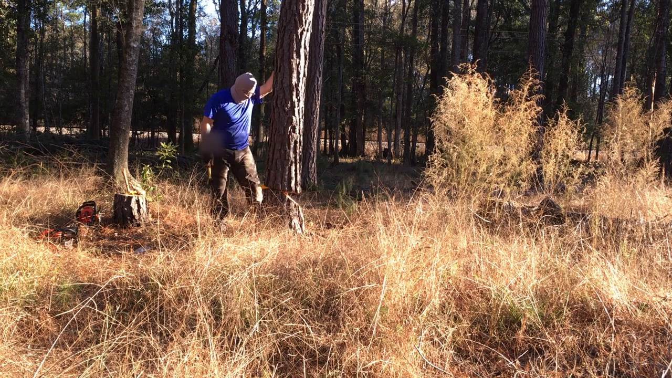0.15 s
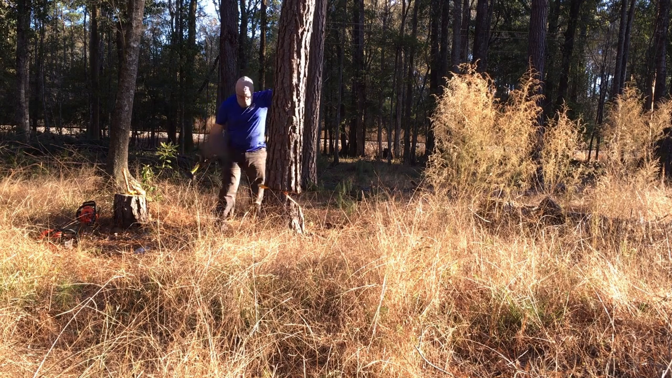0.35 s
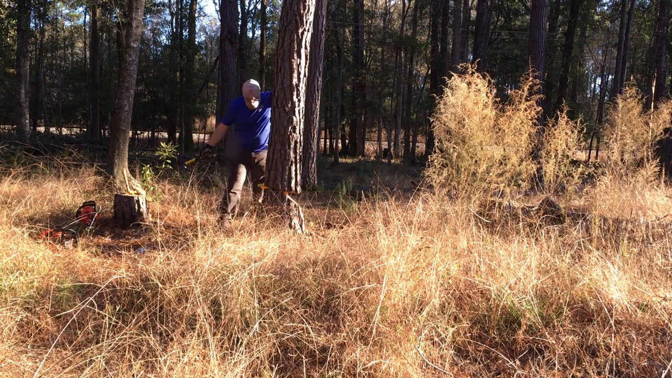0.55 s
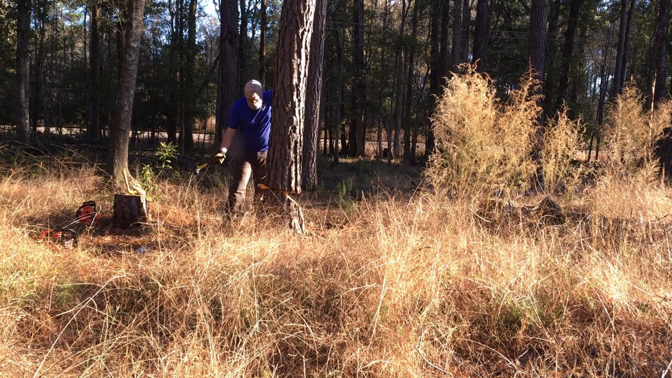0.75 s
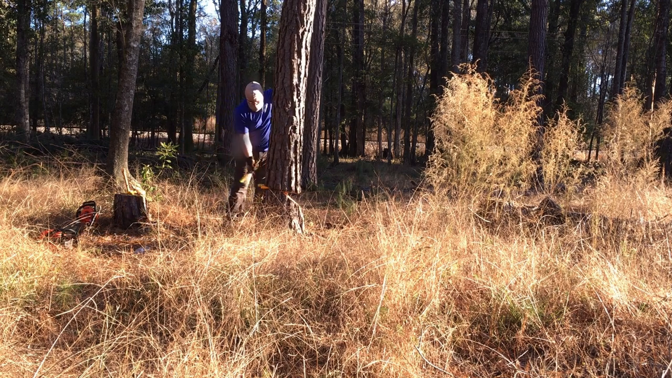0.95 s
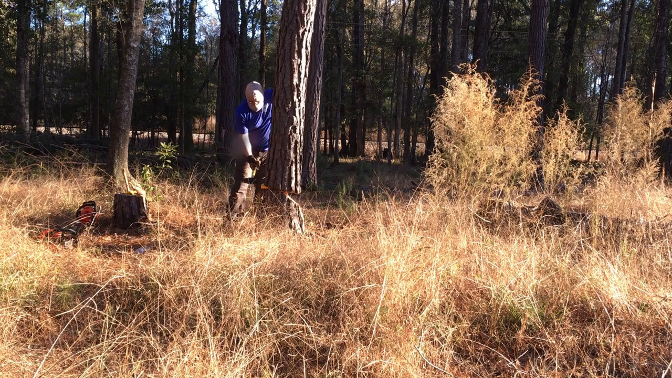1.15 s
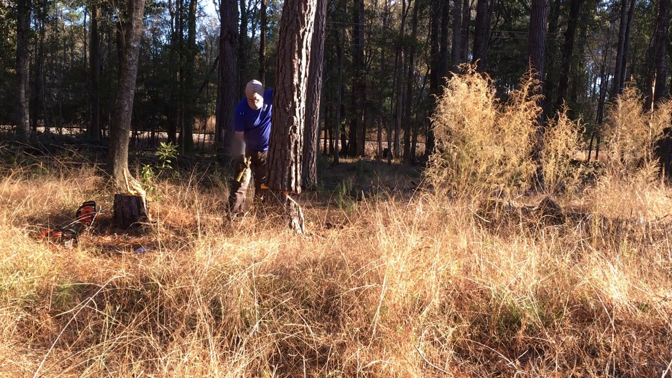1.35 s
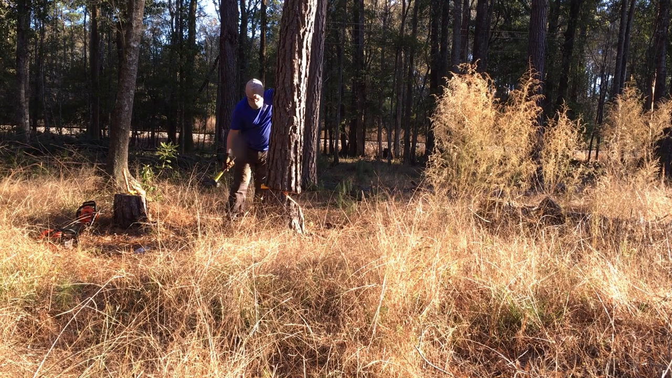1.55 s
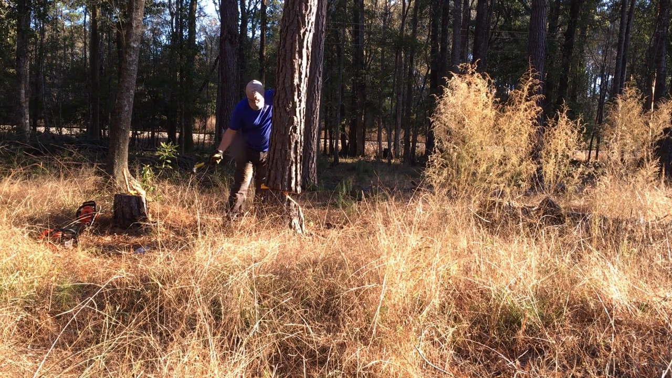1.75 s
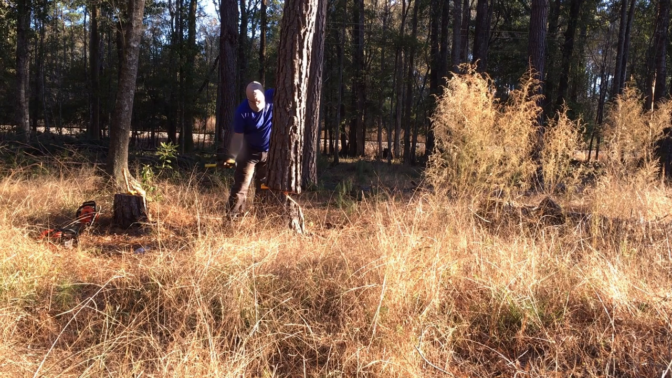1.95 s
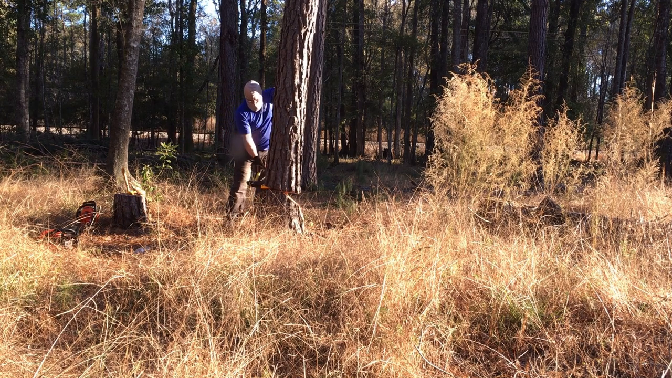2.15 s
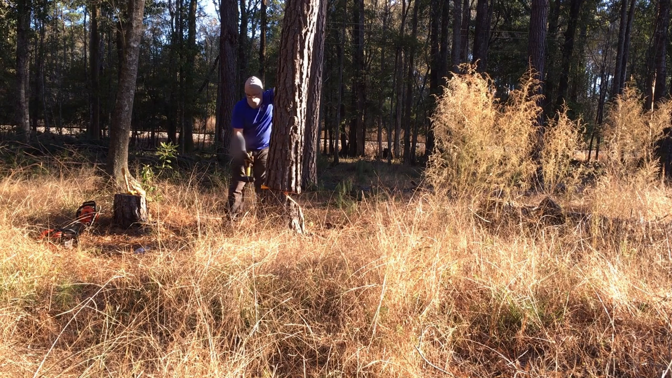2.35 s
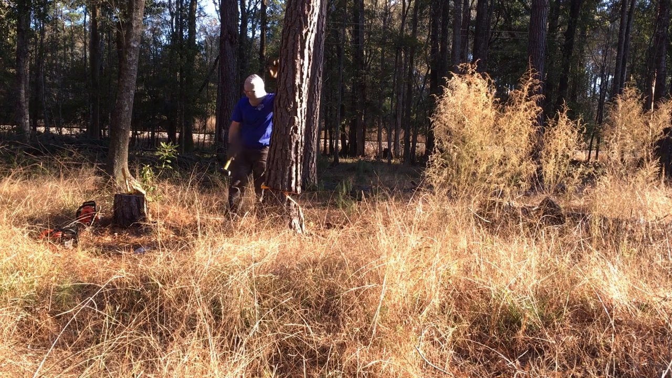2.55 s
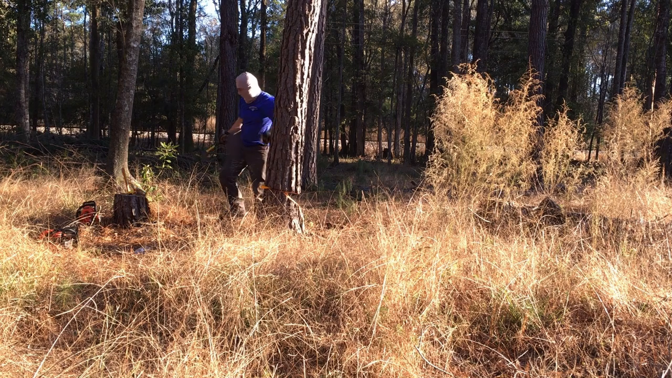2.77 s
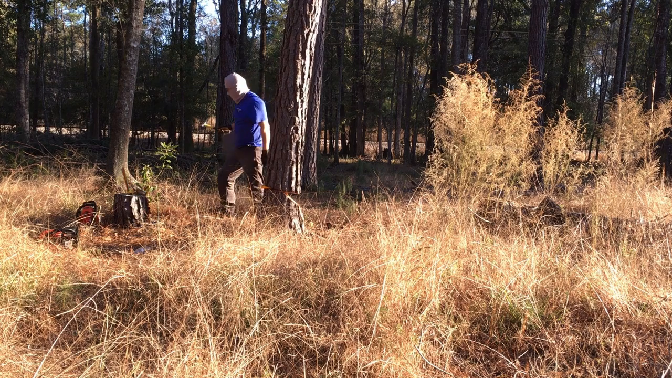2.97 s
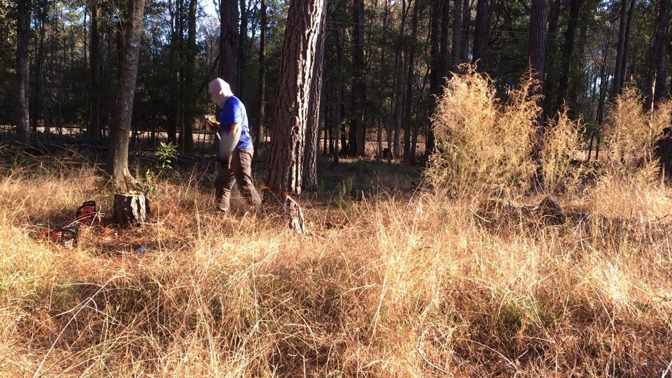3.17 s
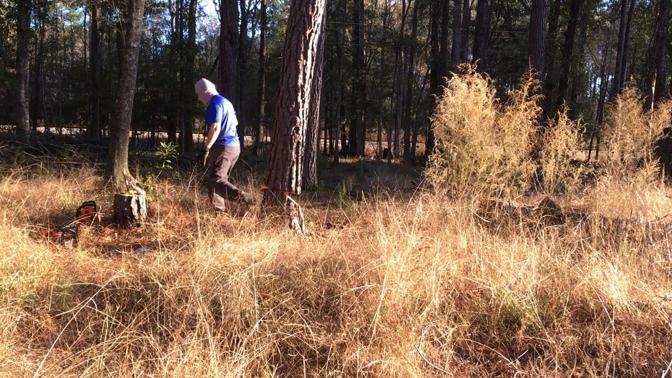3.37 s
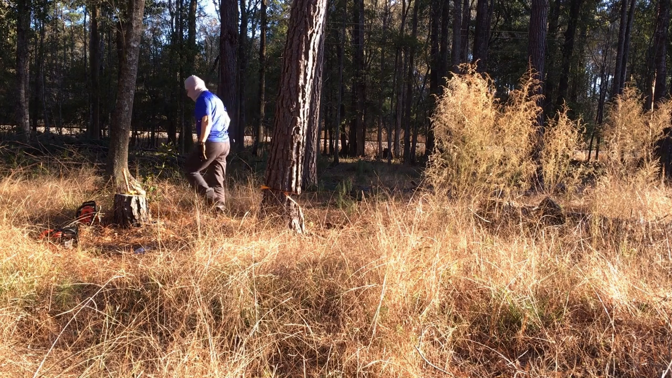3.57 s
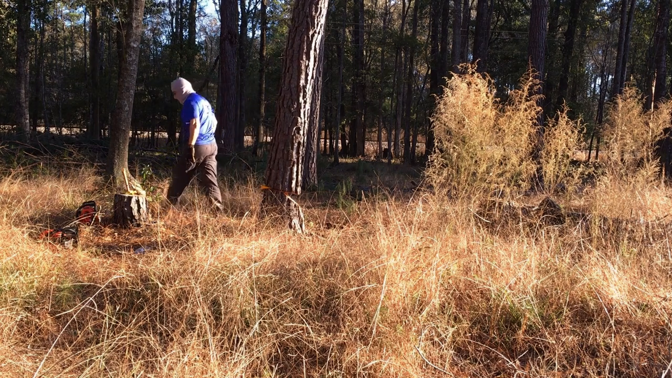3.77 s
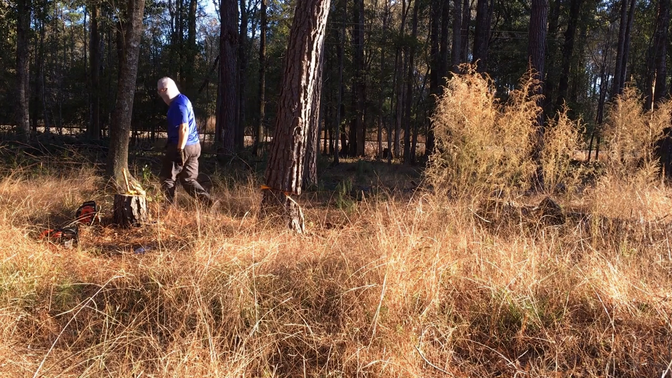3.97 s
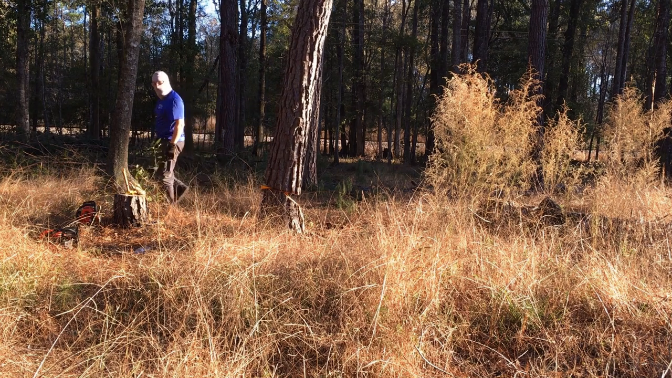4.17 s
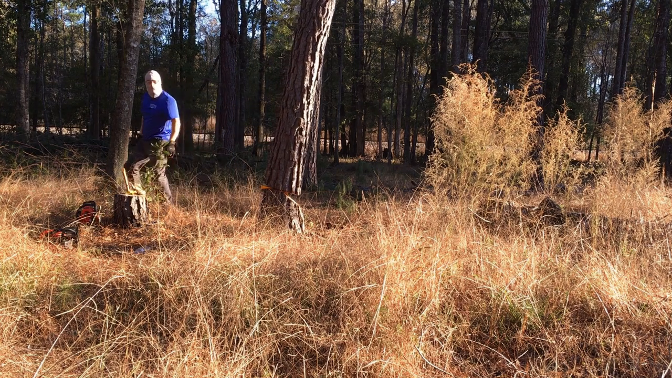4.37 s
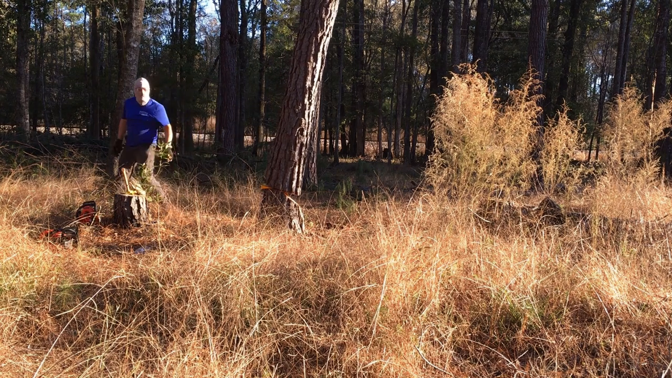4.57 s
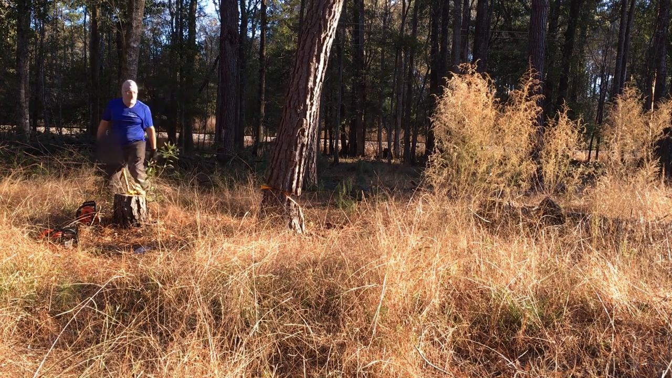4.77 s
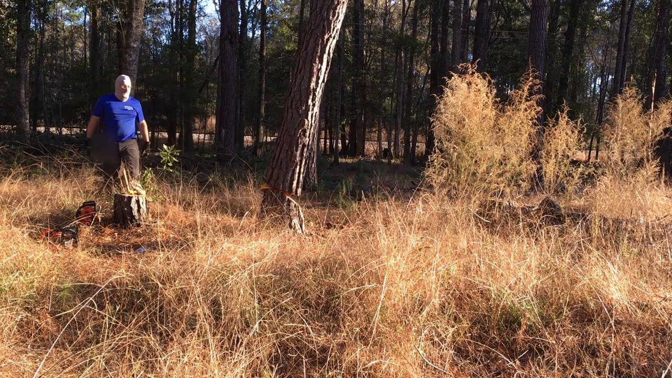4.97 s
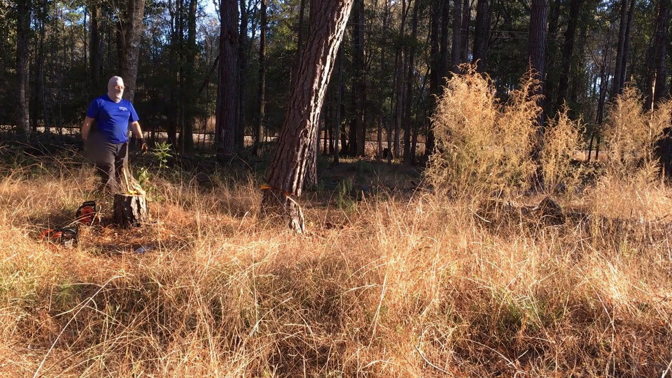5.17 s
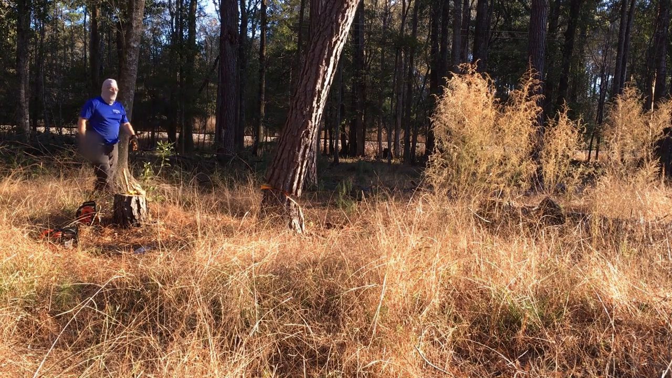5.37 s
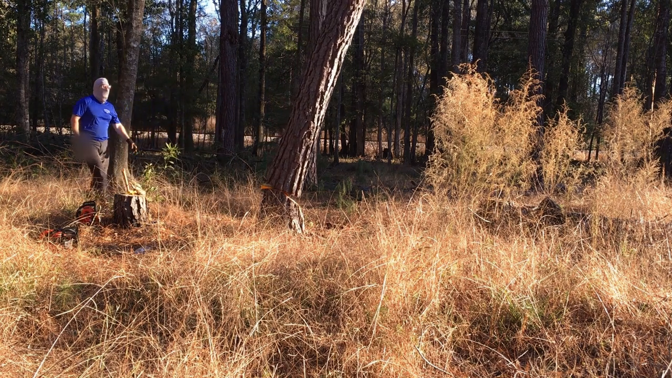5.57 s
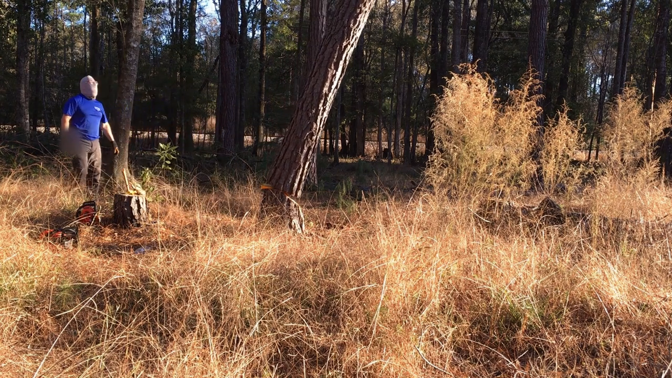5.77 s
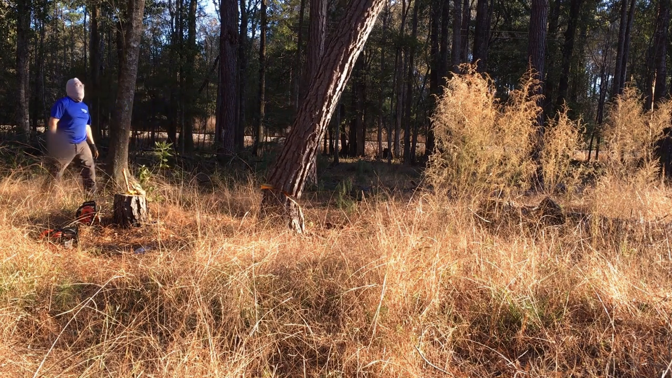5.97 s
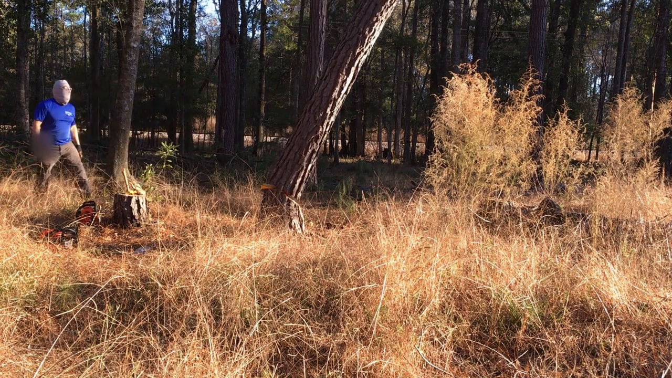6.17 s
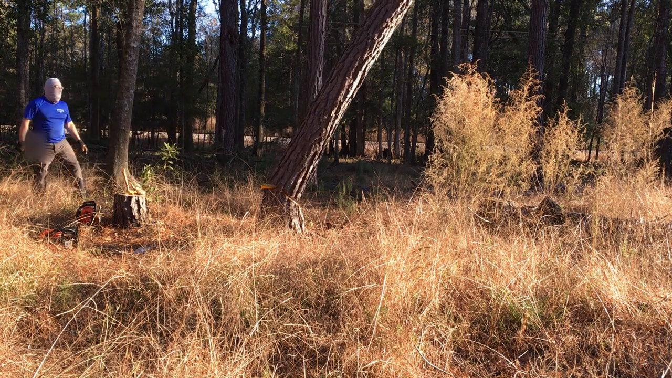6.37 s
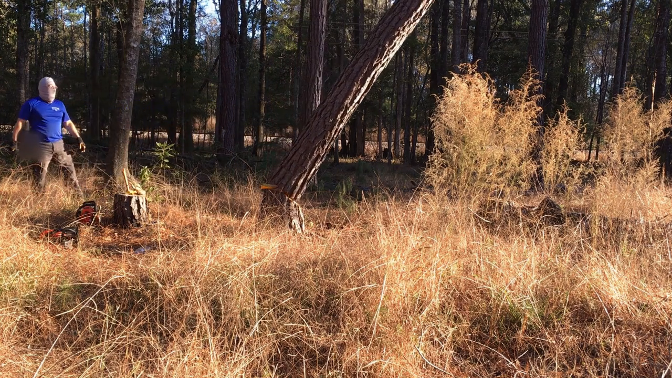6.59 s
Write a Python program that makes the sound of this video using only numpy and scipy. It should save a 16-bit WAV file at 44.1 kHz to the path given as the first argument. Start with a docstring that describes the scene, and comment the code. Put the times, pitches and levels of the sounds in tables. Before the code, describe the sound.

A quiet woodland edge, with a faint low rumble of still air and slight dry-grass rustling, soft footfalls at about 0.4 and 0.7 seconds. At 1.05 a loud, sharp double-edged crack bursts from a tree trunk, with a woody knock, brief splintering and echoes from the surrounding trees. A second strong, hollow crack comes at 2.2. From about 2.7 to 4.9 legs brush through dry stalks with dull steps, most clearly around 3.3 and 3.8 to 4.0, while isolated fibres tick, growing more frequent from 4.4. A thinner, snappier crack falls at 5.1. Ticks and pops then crowd together, and from about 5.5 a dry, dense crackle rises. At 6.4 the loudest crack bursts out, bright and ragged, with several splintering aftershocks. Tearing continues, still intensifying, until the end at 6.6 seconds, before any fall is heard.

```python
"""At the edge of a wood a notched pine starts to go over. Its hinge, the wood left uncut, gives four loud cracks.
Each crack mixes a snap, a knock and splintering that rings the trunk; echoes return from the trees.
In between, single fibres tick as short bursts, while thin ones tear ever faster into a dense crackle.
The feller moves through dry grass, made of random clicks; filtered noise is a faint low rumble.
"""
import sys
import numpy as np
from scipy import signal
from scipy.fft import rfft, irfft
from scipy.io import wavfile

SR = 44100
rng = np.random.default_rng(int(sys.argv[2]) if len(sys.argv) > 2 else 0)


def wav_out(sig):
    """Save sig, one row per channel (or a flat mono array), as 16-bit PCM at SR to the path in sys.argv[1]."""
    wavfile.write(sys.argv[1], SR, np.round(np.clip(np.atleast_2d(sig).T, -1, 1) * 32767).astype(np.int16))


N = 292383
TIME = np.arange(N) / SR
BRIEF = TIME[:SR // 8]  # time axis of one short burst

# loud breaks of the hinge: [t/s, snap level/dB, wood level/dB, wood pitch f/Hz,
# splintering decay t/s, knock f/Hz, knock level/dB]
HINGE_BREAKS = [(1.0509, -21.5, -22.5, 1860, 0.0013, 790, -27.5),
                (1.055, -27, -19.5, 2800, 0.001, 1930, -22), (1.058, -38.5, -9.5, 2150, 0.0078, 813, -19),
                (2.1655, -27, -9, 1620, 0.0072, 805, -14.5),
                (5.1037, -21, -24.5, 1350, 0.0046, 1185, -23.5), (5.111, -37, -36, 1200, .006, 760, -37.5),
                (6.3923, -12.5, -8.5, 2150, 0.00053, 1190, -17),
                (6.3932, -46, -12.5, 4020, 0.011, 372, -32), (6.4007, -25, -12.5, 3370, 0.0055, 1210, -34),
                (6.419, -39, -15.5, 3100, .001, 1180, -41), (6.4235, -41, -16.5, 2720, 0.014, 1170, -52)]
# ways the cut trunk rings: [f/Hz, width f/Hz, relative level/dB]
TRUNK_MODES = [(737, 200, -4.5), (1110, 280, -9), (1440, 410, -2), (1783, 90, -1), (2200, 43, -8),
               (3150, 350, -5), (3700, 500, -3)]
# tone colour of the snap: [f/Hz, relative level/dB]
SNAP_COLOUR = [(100, 7), (500, -17), (900, -6.5), (1800, 8.5), (3300, -11.5), (4300, -4), (6000, -2.5),
               (9000, -1.5), (11000, -14.5), (16000, -26.5)]
# tone colour of the splintering: [f/Hz, relative level/dB]
SPLINTER_COLOUR = [(100, -2), (300, -53.5), (480, -10.5), (750, -6), (2000, 0), (4200, -2), (5200, -2),
                   (9000, -6), (16000, -10.5)]
# the trunk shudders after the big breaks: [t/s, level/dB, lowest f/Hz]
TRUNK_SHUDDERS = [(1.056, -41, 49.3), (2.165, -37.5, 45), (5.102, -47.5, 130), (6.391, -37, 150)]
# tone colour of the shudder and of a footfall's thud: [f/Hz, relative level/dB]
SHUDDER_COLOUR = [(25, -29.5), (60, 6), (100, -10.5), (140, -8.5), (220, -5), (340, -6.5), (500, -15.5),
                  (1200, -51)]
# thick fibres parting one by one: [t/s, relative level/dB, brightness f/Hz, relative stump ring level/dB]
THICK_FIBRES = [(2.074, -40.5, 8000, -31), (3.319, -33, 2380, -19), (3.447, -36.5, 5900, -30.5),
                (3.532, -25.5, 2820, -16.5), (3.926, -31, 2250, -22), (4.366, -40, 6000, -24),
                (4.4319, -23, 2370, -28), (4.497, -20, 2800, -15), (4.681, -42, 3400, -6.5),
                (4.768, -50.5, 2800, -1), (4.855, -28, 4150, -31), (5.135, -35, 4500, -21),
                (5.1683, -29.5, 9060, -35), (5.3344, -33.5, 5400, -24), (5.399, -26.5, 3300, -26),
                (5.4543, -15, 2870, -25), (5.589, -16, 3330, -28), (5.659, -29.5, 6900, -53),
                (5.6732, -18, 6270, -28.5), (5.678, -23, 3350, -29), (5.733, -20.5, 4740, -24),
                (5.7712, -14, 3120, -28.5), (5.824, -25, 4400, -25), (5.8674, -28.5, 3400, -19),
                (5.89, -22.5, 2940, -20), (5.983, -19.5, 8500, -29), (6.037, -22.5, 4400, -29),
                (6.103, -17, 4080, -32.5), (6.186, -23.5, 4200, -14.5), (6.2287, -27, 4500, -18),
                (6.368, -18.5, 3770, -21.5), (6.303, -29, 3500, -20), (6.535, -17.5, 2680, -19.5),
                (6.608, -19, 3740, -11), (6.6264, -17.5, 2160, -7.5)]
# tone colour of parting fibres and of the rasp: [f/Hz, relative level/dB]
TICK_COLOUR = [(100, -21), (500, -20.5), (900, -12.5), (1800, 0.5), (2400, -3.5), (3300, 0.5), (4300, 0),
               (6000, -0.5), (9000, -1), (11000, -6), (16000, -13)]
# echoes off the nearest trunks, before they are dulled: [delay t/s, level/dB]
NEAR_ECHOES = [(.008, -18.5), (.027, -22.5), (0.0304, -18), (.037, -22.5), (.05, -39), (.066, -30.5)]
# answer of the far wood: [f/Hz, relative level/dB, time to fall by 60 dB t/s]
FAR_WOOD = [(152, -30, 0.61), (400, -22, 0.54), (760, -11.5, 2.8), (1150, -12.5, 1.5), (1600, -21.5, 2.1),
            (2250, -20, 1.5), (3400, -17.5, 1.3), (4760, -19.5, .7), (6600, -19.5, .65), (9500, -21, 0.43),
            (15000, -37.5, 0.33)]
# legs sweep through dry grass: [t/s at the peak, level/dB, swell t/s]
LEG_SWEEPS = [(.42, -70, 0.02), (0.702, -57, 0.042), (2.08, -76.5, .08), (2.75, -59.5, 0.077),
              (3.2, -65, 0.1), (3.7, -63.5, 0.031), (3.832, -53, 0.04), (4.008, -54.5, 0.024),
              (4.501, -69, 0.085), (4.842, -63, 0.13)]
# faint rustle between the sweeps, standing and then walking: [t/s, level/dB]
RUSTLE_LEVEL = [(0, -96), (.35, -77.5), (1.8, -82.5), (2.9, -69.5), (6.63, -75.5)]
# tone colour of dry stalks: [f/Hz, relative level/dB]
STALK_COLOUR = [(200, -7), (500, -12), (1100, -6), (2200, -5), (3500, -1), (6000, -0.5), (9500, -1.5),
                (10800, -5.5), (14000, -5.5), (16000, -17.5)]
# footfalls: [t/s, thud level/dB, scuff level/dB]
FOOTFALLS = [(0.355, -61, -75), (0.678, -49, -67), (3.317, -42.5, -74), (4.15, -55, -66),
             (4.678, -49.5, -71)]
# tone colour of the still air of the wood: [f/Hz, relative level/dB]
AIR_COLOUR = [(20, -37.5), (35, -6.5), (62, 2.5), (95, 3), (140, -5.5), (250, -14.5), (500, -21.5),
              (1300, -24), (2500, -28.5), (5000, -36), (10000, -46), (16000, -44.5)]
# loudness of that air: [t/s, level/dB]
AIR_LEVEL = [(0, -71.5), (.3, -67), (.4, -61.5), (3, -62.5), (6.63, -57.5)]

SNAP_HZ, SNAP_WIDTH_HZ = 4500, 13230
FAR_RING_DB = -13  # trunk ring and knock in what spreads into the wood
STUMP_HZ, STUMP_WIDTH_HZ = 1139, 125
FIBRE_RASP_S, FIBRE_RASP_DB = 0.004, -8  # short rasp of a thick fibre, relative to its tick
# the tearing grows exponentially throughout; around GIVE_S the hinge gives and the rasp sets in
GIVE_S, GIVE_SPAN_S, RUNAWAY_S = 5.614, 0.34, 0.55
# thin fibres: constant base rate, and the growing rate and the level as they stand at GIVE_S
CREEP_PER_S, TEAR_PER_S, THIN_FIBRE_DB = 6, 45, -47
STRAIN_DB_PER_S, FIBRE_SIZE_SPREAD_DB = 5.5, 4.0
# a thick fibre takes thin ones with it, shortly before and after it parts
THIN_PER_THICK, CLUSTER_S = 2, 0.012
RASP_DB, RASP_PER_S, RASP_SPREAD_DB = -54, 2200, 5.0
SCUFF_HZ, SCUFF_WIDTH_HZ, SCUFF_S = 900, 890, 0.035
CUTOFF_HZ = 16300


def from_db(db):
    """Turn decibels into a plain loudness factor."""
    return 10 ** (np.asarray(db) / 20)


def rms_one(x):
    """Scale a sound to an average (rms) strength of 1."""
    return x / np.sqrt(np.mean(x ** 2) + 1e-20)


def unit_energy(x):
    """Scale a sound to a total energy of 1."""
    return x / np.sqrt(np.sum(x ** 2) + 1e-20)


def one_ms(x):
    """Scale a burst to the energy of one millisecond at rms 1."""
    return unit_energy(x) * np.sqrt(SR / 1000)


def level_curve(rows):
    """Join the levels of a (time, level) table by straight lines."""
    times, levels = np.transpose(rows)
    return np.interp(TIME, times, levels)


def at_hz(rows, hz, axis=1):
    """Read a column of a spectrum, evenly in pitch rather than in Hz."""
    rows = np.array(rows)
    return np.interp(np.log(hz + 1), np.log(rows[:, 0]), rows[:, axis])


def colour(x, spectrum, size=4096):
    """Filter to a given spectrum with no sound ahead of its cause (minimum phase)."""
    gain = from_db(at_hz(spectrum, np.fft.rfftfreq(size, 1 / SR)))
    cepstrum = irfft(np.log(gain))
    # folding the second half onto the first makes the filter respond at once
    cepstrum[1:size // 2] *= 2
    cepstrum[size // 2 + 1:] = 0
    response = irfft(np.exp(rfft(cepstrum)))
    return signal.fftconvolve(x, response)[:len(x)]


def resonance(x, hz, width_hz):
    """Let a sound ring around one pitch, with gain 1 at the top."""
    b, a = signal.iirpeak(hz, hz / width_hz, fs=SR)
    return signal.lfilter(b, a, x + 1e-18)


def low_cut(x, hz):
    """Steeply take away everything below a pitch."""
    return signal.sosfilt(signal.butter(4, hz, "high", fs=SR, output="sos"), x + 1e-18)


def burst(decay_s):
    """Make a dying volley of tiny fractures that push or pull."""
    return rng.choice([-1, 1], len(BRIEF)) * np.exp(-BRIEF / decay_s)


def grains(per_s, spread_db):
    """Scatter random clicks of uneven size, with rms near 1 at any rate."""
    excess = np.minimum(rng.exponential(1, N), 4)
    sizes = rms_one(from_db(spread_db * excess)) * rng.choice([-1, 1], N)
    happens = rng.random(N) < per_s / SR
    return sizes * happens * np.sqrt(SR / per_s)


def swell(s, span_s):
    """Rise and fall roundly to height 1 at time s, with exponential flanks."""
    return 1 - np.tanh((TIME - s) / span_s) ** 2


def add(out, s, sound):
    """Mix a sound in at time s."""
    start = int(np.clip(round(s * SR), 0, N - 1))
    out[start:start + len(sound)] += sound[:N - start]


def cracks(snap_decay_s=0.00089, ring_db=4.0, splinter_db=0.0, relative_width=0.88,
           rise_s=0.00018, knock_width_hz=100):
    """Snap, knock and splinter, ringing the trunk; return the direct sound and what spreads into the wood."""
    direct, radiated = np.zeros((2, N))
    pulse = signal.unit_impulse(len(BRIEF))
    for s, snap_db, wood_db, hz, decay_s, knock_hz, knock_db in HINGE_BREAKS:
        snap = colour(burst(snap_decay_s), SNAP_COLOUR)
        snap = from_db(snap_db) * one_ms(resonance(snap, SNAP_HZ, SNAP_WIDTH_HZ))
        knock = from_db(knock_db) * one_ms(resonance(pulse, knock_hz, knock_width_hz))

        volley = burst(decay_s) * (1 - np.exp(-BRIEF / rise_s))
        push = volley * np.exp(-BRIEF / decay_s)
        modes = unit_energy(sum(from_db(db) * unit_energy(resonance(push, f, width))
                                for f, width, db in TRUNK_MODES))
        splinters = unit_energy(colour(volley, SPLINTER_COLOUR))
        wood = from_db(ring_db) * modes + from_db(splinter_db) * splinters
        wood = from_db(wood_db) * one_ms(resonance(wood, hz, relative_width * hz))
        add(direct, s, snap + knock + wood)

        # summed over all directions the splintering evens out and the modes stand out less
        even = from_db(FAR_RING_DB) * modes + unit_energy(colour(pulse, SPLINTER_COLOUR))
        even = from_db(wood_db) * one_ms(resonance(even, hz, relative_width * hz))
        add(radiated, s, snap + from_db(FAR_RING_DB) * knock + even)
    return direct, radiated


def shudders(swell_s=0.02, return_s=0.072, return_hz=190, return_width_s=0.015, return_db=-5.5):
    """Slow bending waves swell after a break; one comes back along the trunk as a dull thud."""
    out = np.zeros(N)
    t = TIME[:2 * len(BRIEF)]
    thud_shape = np.exp(-((t - return_s) / return_width_s) ** 2)
    thud = from_db(return_db) * np.sin(2 * np.pi * return_hz * t) * thud_shape
    wave_shape = t / swell_s * np.exp(1 - t / swell_s)
    for s, db, lowest_hz in TRUNK_SHUDDERS:
        waves = rms_one(colour(rng.standard_normal(len(t)), SHUDDER_COLOUR)) * wave_shape
        add(out, s, from_db(db) * low_cut(waves + thud, lowest_hz))
    return out


def fibres(decay_s=0.0011, relative_width=1.12, tick_db=-10.5, ring_db=11.0):
    """Each thick fibre parts with a sharp tick and a short rasp, and knocks on the stump."""
    out = np.zeros(N)
    knock = one_ms(resonance(signal.unit_impulse(len(BRIEF)), STUMP_HZ, STUMP_WIDTH_HZ))
    for s, db, hz, stump_db in THICK_FIBRES:
        short_rasp = from_db(FIBRE_RASP_DB) * unit_energy(burst(FIBRE_RASP_S))
        force = unit_energy(burst(decay_s)) + short_rasp
        tick = one_ms(resonance(colour(force, TICK_COLOUR), hz, relative_width * hz))
        add(out, s, from_db(db + tick_db) * (tick + from_db(stump_db + ring_db) * knock))
    return out


def tearing(grain_s=0.0006, stump_db=-3.0, relative_width=1.3, low_hz=1900, high_hz=7000, count=6):
    """Thin fibres part in clusters about the thick ones, and more and louder as the tree leans."""
    clusters = THIN_PER_THICK / (2 * CLUSTER_S) * sum(swell(s, CLUSTER_S) for s, *_ in THICK_FIBRES)
    runaway = TEAR_PER_S * np.exp((TIME - GIVE_S) / RUNAWAY_S)
    per_s = CREEP_PER_S + clusters + runaway
    size = from_db(THIN_FIBRE_DB + STRAIN_DB_PER_S * (TIME - GIVE_S))
    out = np.zeros(N)
    for hz in np.geomspace(low_hz, high_hz, num=count):
        tick = resonance(colour(burst(grain_s), TICK_COLOUR), hz, relative_width * hz)
        stump = from_db(stump_db) * resonance(tick, STUMP_HZ, STUMP_WIDTH_HZ)
        clicks = grains(per_s / count, FIBRE_SIZE_SPREAD_DB)
        out += signal.fftconvolve(clicks, one_ms(tick + stump))[:N]
    # undo the rate scaling of grains(), so more ticks also sound louder together
    return size * np.sqrt(per_s / count / SR) * out


def rasp():
    """The finest splinters make a dry crackle that sets in as the hinge gives."""
    given = 0.5 + 0.5 * np.tanh((TIME - GIVE_S) / GIVE_SPAN_S)
    crackle = rms_one(colour(grains(RASP_PER_S, RASP_SPREAD_DB), TICK_COLOUR))
    return from_db(RASP_DB) * given * crackle


def near_trunks(x, scatter_db=-18.0, scatter_decay_s=0.032, bark_cut_hz=8000, bark_s=0.0025):
    """Rough trunks and brush nearby throw back smeared, duller echoes."""
    t = TIME[:SR // 2]
    scatter = rng.standard_normal(len(t)) * t * np.exp(-2 * t / scatter_decay_s)
    response = from_db(scatter_db) * unit_energy(scatter)
    for delay_s, db in NEAR_ECHOES:
        add(response, delay_s, from_db(db) * unit_energy(burst(bark_s)))
    response = signal.sosfilt(signal.butter(1, bark_cut_hz, fs=SR, output="sos"), response)
    return signal.fftconvolve(x, response)[:N]


def forest(x, build_s=0.018):
    """The far wood answers with a tail of noise bands; the middle lasts longest, the high treble dies first."""
    t = TIME[:2 * SR]
    response = np.zeros(len(t))
    edges = np.geomspace(100, 17000, 15)
    for low, high in zip(edges, edges[1:]):
        hz = np.sqrt(low * high)
        fade = np.exp(-np.log(1000) * t / at_hz(FAR_WOOD, hz, axis=2))  # a factor of 1000 is 60 dB
        tail = rng.standard_normal(len(t)) * (1 - np.exp(-t / build_s)) * fade
        band = signal.butter(2, [low, high], "band", fs=SR, output="sos")
        response += from_db(at_hz(FAR_WOOD, hz)) * signal.sosfilt(band, unit_energy(tail))
    return signal.fftconvolve(x, response)[:N]


def feller(stalks_per_s=7000):
    """Dry stalks brush and crackle with each sweep of a leg; a few steps thud and scuff in the litter."""
    power = from_db(level_curve(RUSTLE_LEVEL)) ** 2
    for s, db, swell_s in LEG_SWEEPS:
        power = power + from_db(db) ** 2 * swell(s, swell_s)
    stalks = rms_one(colour(grains(stalks_per_s, spread_db=4.0), STALK_COLOUR))
    out = np.sqrt(power) * stalks
    litter = rms_one(resonance(grains(stalks_per_s, spread_db=4.5), SCUFF_HZ, SCUFF_WIDTH_HZ))
    for s, thud_db, scuff_db in FOOTFALLS:
        add(out, s, from_db(thud_db) * one_ms(colour(burst(decay_s=0.013), SHUDDER_COLOUR)))
        out += from_db(scuff_db) * swell(s, SCUFF_S) * litter
    return out


def air():
    """The air of the wood is noise that grows louder overall, coloured into a faint low rumble."""
    return from_db(level_curve(AIR_LEVEL)) * rms_one(colour(rng.standard_normal(N), AIR_COLOUR))


def scene(splinter_low_hz=150, small_near_db=-1.5, small_far_db=-2.0):
    """Mix tree, echoes, feller and air; only the whole trunk can radiate deep bass."""
    direct, radiated = cracks()
    trunk = low_cut(direct, splinter_low_hz) + shudders()
    small = low_cut(fibres() + tearing() + rasp(), splinter_low_hz)
    # fibres part inside the cut, which beams them forward: they raise fewer echoes
    near = near_trunks(trunk + from_db(small_near_db) * small)
    far = forest(radiated + from_db(small_far_db) * small)
    return (trunk + small + near + far + feller() + air())[None]


def record(dry):
    """Cut the top of the treble steeply."""
    return signal.sosfilt(signal.ellip(10, 0.2, 80, CUTOFF_HZ, fs=SR, output="sos"), dry)


dry = scene()
out = record(dry)
wav_out(out)
```